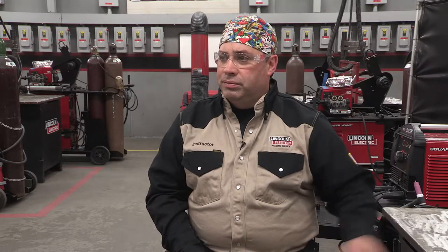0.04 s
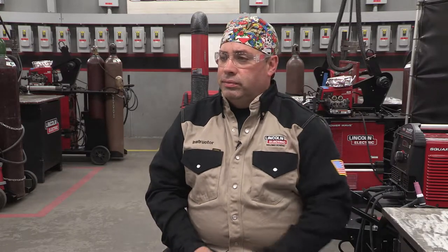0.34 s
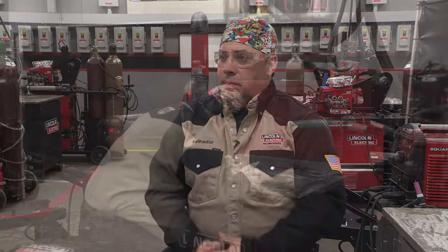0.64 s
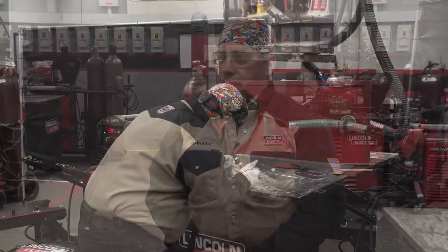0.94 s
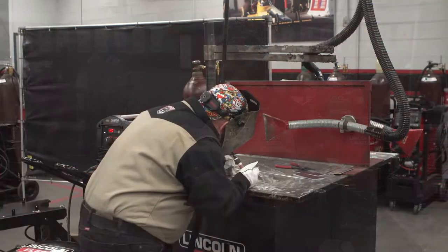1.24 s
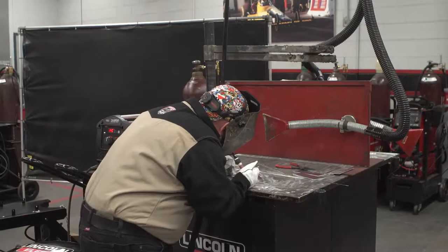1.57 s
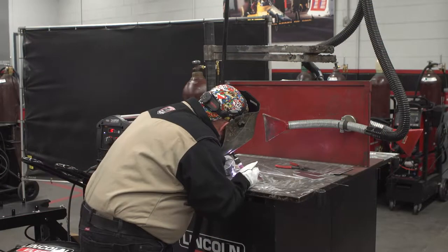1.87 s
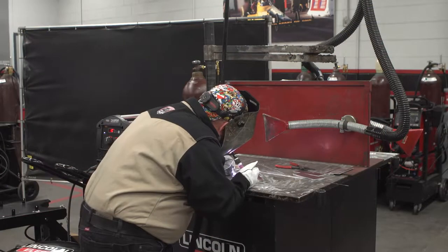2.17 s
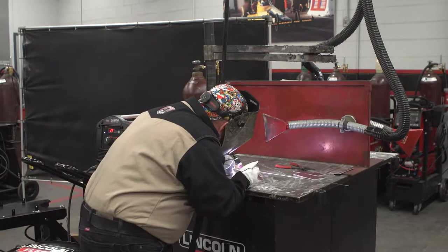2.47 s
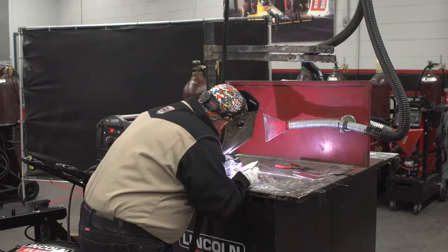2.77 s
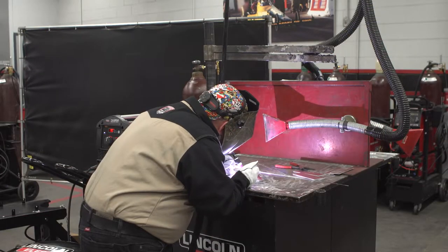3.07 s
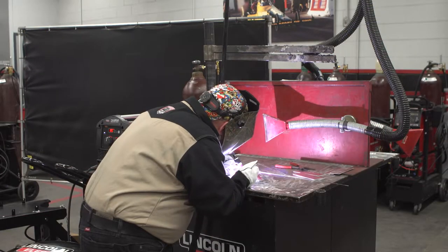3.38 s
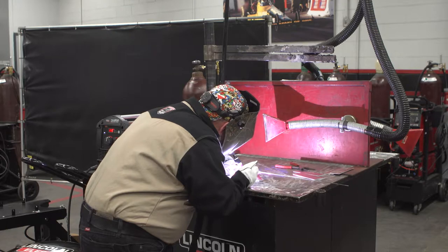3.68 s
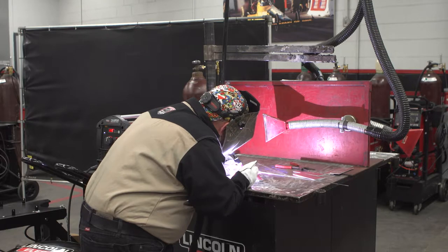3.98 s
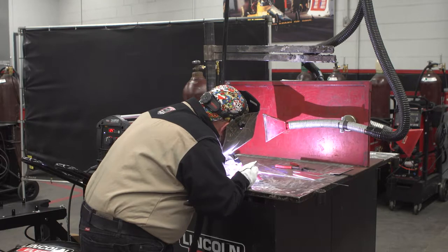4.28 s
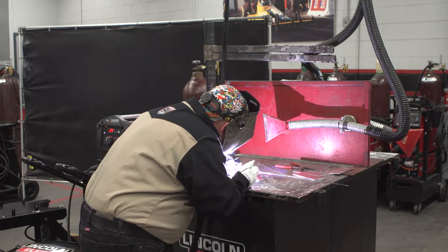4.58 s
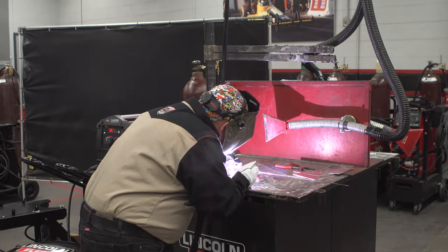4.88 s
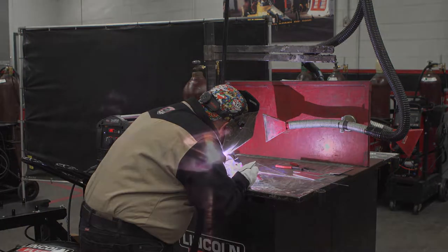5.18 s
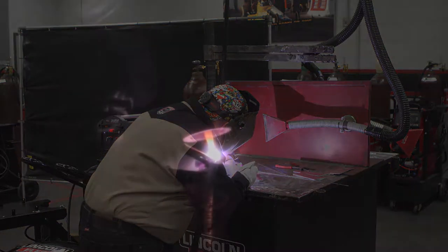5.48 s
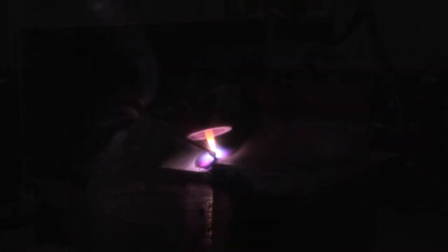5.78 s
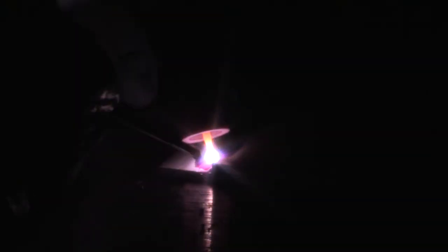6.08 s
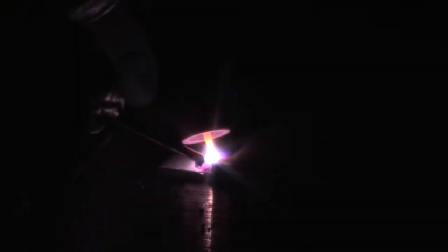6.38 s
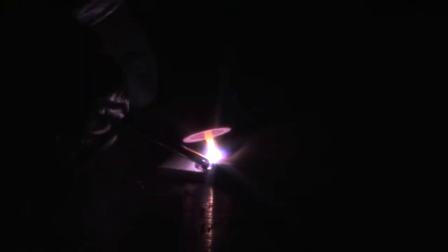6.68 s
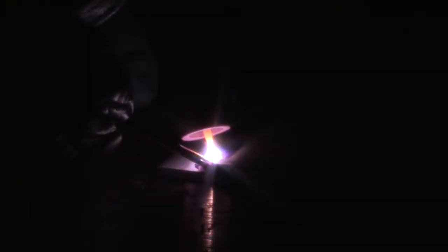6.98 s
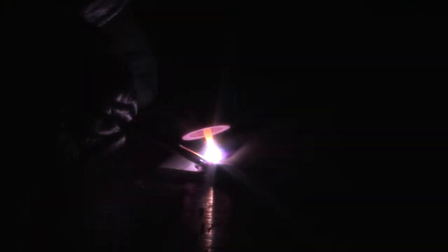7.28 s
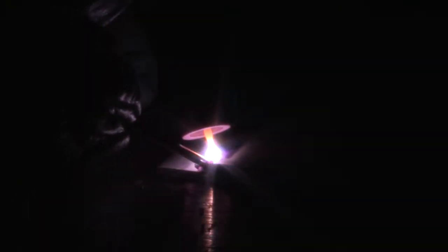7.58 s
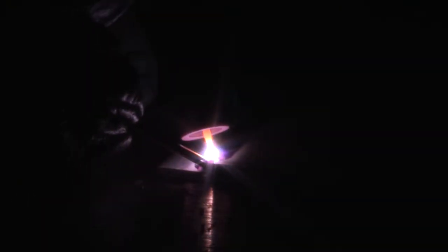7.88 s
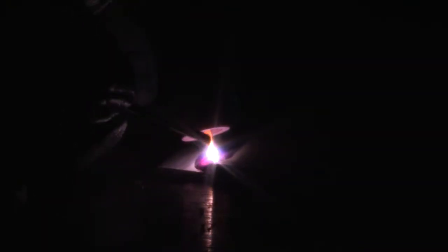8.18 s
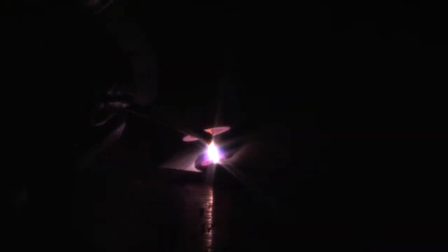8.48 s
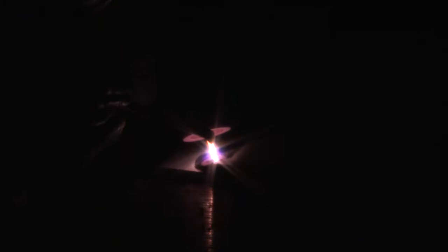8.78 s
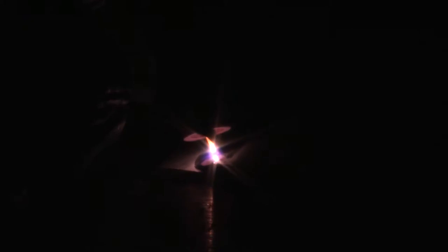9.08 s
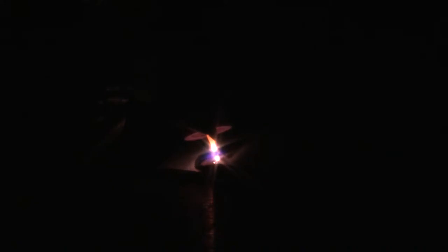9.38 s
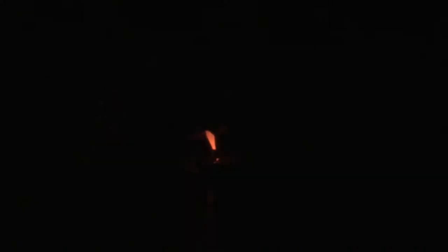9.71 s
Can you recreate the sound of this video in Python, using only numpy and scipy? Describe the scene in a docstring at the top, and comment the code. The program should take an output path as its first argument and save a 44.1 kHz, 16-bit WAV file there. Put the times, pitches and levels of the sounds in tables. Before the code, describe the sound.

A fume extractor's airy roar and low rumble rise at the start in a slightly reverberant workshop, with a faint hiss of gas. Light ticks come at about 0.3 and 1 second, then a few small sputters. At 1.7 seconds a welding arc strikes with a pop and begins a subdued electric buzz. Between 2.4 and 2.8 seconds it swells loud and raspy, with a low hum, a fast, even flutter and a growing sizzle. Small spits dot the buzz until about 5.2 seconds. Then the sound shifts to close beside the torch, where the buzz changes colour and the hiss drops back. Two brief spits come near 6.7 seconds. From about 8.1 seconds the buzz tapers down, turns slightly harsher near 9.4 and cuts off at 9.6, leaving only the extractor and faint gas hiss.

```python
"""AC TIG welding in a workshop. Over a fume extractor and the hiss of shielding gas come a few ticks,
then the arc pops alight. It buzzes: each current cycle snaps at both changes of polarity and pushes
the heated air, and the pulse train stumbles 17 times a second. The current rises and the pool spits.
Heard at first from behind the welder, then from close to the torch, the arc is tapered down,
the torch lifts and the arc goes out."""
import sys
import numpy as np
from scipy import signal
from scipy.fft import rfft, irfft, next_fast_len
from scipy.io import wavfile
from scipy.ndimage import uniform_filter1d, map_coordinates

SR = 44100
rng = np.random.default_rng(int(sys.argv[2]) if len(sys.argv) > 2 else 0)


def dump_mix(stems):
    """Bounce the given channels to the path in sys.argv[1] as a 16-bit WAV at rate SR."""
    frames = np.atleast_2d(stems).T  # one column per channel
    limited = np.clip(frames, -1, 1)  # hard clip at full scale
    pcm = np.round(limited * 32767).astype(np.int16)
    wavfile.write(sys.argv[1], SR, pcm)


N = 434385

CYCLE_S, REVERSAL_S = .008298, .00209  # period of the current; delay of its second snap
ARC_ON_S, CUT_S = 1.8064, 5.266  # the arc holds; the scene changes from the bench to beside the torch
# Foot pedal (low start, full current, taper to fill the crater): time_s, current_db
CURRENT = [(1.8, -10), (2.38, -13.5), (2.83, .5), (3.5, -1.5), (5.25, 0), (5.8, -1), (6.15, 1), (8.1, -1),
           (8.6, -5), (8.9, -10.5), (9.35, -17)]


def arc():
    """Periodic excitation: snaps and air pulses make a buzz, heard at the bench, then by the torch."""
    # Resonances of the snaps at each place: pitch_hz, width_hz, gain_db
    bench_modes = [(1320, 1200, -11), (1706, 73, 5), (2188, 110, -2.5), (3210, 170, -6.5),
                   (3634, 110, -4.5), (4194, 330, -4), (4700, 970, -12), (6580, 240, -5.5),
                   (7290, 220, -7.5), (8030, 760, -8.5), (9580, 1700, -16), (11540, 160, -11),
                   (12580, 480, -20.5), (15700, 170, -35)]
    close_modes = [(1740, 310, -6.5), (2232, 86, 4.5), (2733, 180, -3), (3234, 220, -2), (4110, 780, -2),
                   (5360, 560, -3.5), (6320, 510, -5.5), (7570, 700, -6), (8170, 520, -7.5),
                   (9200, 860, -5), (11650, 620, -10.5), (13350, 700, -10.5), (14500, 1200, -14.5),
                   (15800, 400, -14.5)]
    # Bark, crack, sizzle and fizz bands at each place: base_db, db_per_current_db
    bench_bands = [(-24, 0.27), (-22, 0.33), (-21.5, 0.16), (-30.5, 0.1)]
    close_bands = [(-30, 0.47), (-22.5, 0.37), (-23, 0.3), (-29, 0.35)]
    # Spectrum of the air pulse at each place: frequency_hz, gain_db
    bench_push = [(40, -17), (120, 3), (240, -5.5), (360, -12.5), (480, 1.5), (600, -0.5), (720, -8),
                  (850, -4), (1080, -13), (1250, -4.5), (1500, -27.5), (4000, -64.5)]
    close_push = [(40, -28.5), (120, 2), (240, -4), (360, -10.5), (480, -2.5), (600, 0.5), (720, -12),
                  (960, -7), (1080, -12), (1250, -11.5), (1600, -25.5), (4000, -51)]
    far = cycles(ARC_ON_S, 5.27, spacing_s=.05993, heard_s=0, stumble_s=.0003, slip_s=.00005)
    near = cycles(5.2354, 9.641, spacing_s=.05987, heard_s=CUT_S, stumble_s=.0004, slip_s=.00004)
    bench = snaps(far, bench_modes, bench_bands, second=.69, jitter_s=4e-6,
                  sputter=.16, sputter_t60=.025, glint=1.0)
    close = snaps(near, close_modes, close_bands, second=.41, jitter_s=3e-6,
                  sputter=.18, sputter_t60=.012, glint=.72)
    hum = push(far, bench_push, level_db=-24.5, unrest_db=4.5, gurgle=.34)
    hum += push(near, close_push, level_db=-26.7, unrest_db=1.5, gurgle=.16)
    return amp(-.42) * bench + amp(-.92) * close + hum


def cycles(start_s, end_s, spacing_s, heard_s, stumble_s, slip_s, count=7, misfire_s=2.822):
    """Quantised timing: groups of even cycles restart near a quarter-cycle beat of the welder's clock."""
    # Stumbles that last one beat longer: time_s
    stutters = [1.869, 2.77, 2.95, 4.086, 4.625, 4.865, 5.164, 8.53]
    beat = CYCLE_S / 4
    due = np.arange(0, end_s - start_s, spacing_s)
    stumble, slip = rng.uniform(-1.1, 1, (len(due), 2)).T
    late = np.abs(start_s + due[:, None] - stutters).min(axis=1) < CYCLE_S
    beats = np.round((due + stumble_s * stumble) / beat) + late
    restarts = start_s + beat * beats + slip_s * slip
    times = (restarts[:, None] + CYCLE_S * np.arange(count)).ravel()
    fires = np.abs(times - misfire_s) > CYCLE_S / 2
    return times[(times >= heard_s) & (times < end_s) & fires]


def snaps(times, modes, bands, second, jitter_s, sputter, sputter_t60, glint, spread_db=1.5):
    """Impulse excitation: the arc relights at each polarity change, sputters and rings the modes."""
    # Limits of the four bands: edge_hz
    edges = (1100, 2600, 5800, 11000, 20000)
    chance = rng.standard_normal((4, len(times)))
    lead = unit(clicks(times + jitter_s * chance[0], amp(spread_db * chance[1])))
    reversal = unit(clicks(times + REVERSAL_S + jitter_s * chance[2], amp(spread_db * chance[3])))
    train = unit(lead + second * reversal)
    trail = unit(ring(train, decay(sputter_t60)) * rng.standard_normal(N))
    trail = filtered(trail, lambda hz: 1 + (hz / 11000) ** 2)  # the buzz is roughest in the treble
    drive = train + sputter * trail + glint * glints(lead + .67 * reversal)
    sound = filtered(drive, lambda hz: resonances(modes, hz))
    parts = [filtered(sound, lambda hz: above(hz, lo) - above(hz, hi))
             for lo, hi in zip(edges, edges[1:])]
    return duty(times) * sum(amp(db) * unit(part) for db, part in zip(snap_levels(bands), parts))


def snap_levels(bands, lift_s=9.32, lift_rise_s=.27, flicker_db=.2):
    """Amplitude modulation: each band's level in dB follows current, metal heat and arc length."""
    # Change in each band while the metal is cold: gain_db
    cold_gains = [-10.5, -3.5, 1.1, 1.5]
    # Change in each band as the lifting torch lengthens the arc: gain_db
    lift_gains = [3.4, 2.3, 1.7, 3]
    current_db, cold = curve(CURRENT), settling()
    lift = np.clip((np.arange(N) / SR - lift_s) / lift_rise_s, 0, 1)
    return [db + slope * current_db + cold_db * cold + lift_db * lift + flicker_db * wobble(5)
            for (db, slope), cold_db, lift_db in zip(bands, cold_gains, lift_gains)]


def push(times, colour, level_db, unrest_db, gurgle):
    """Thermal expansion: the air swells once a cycle in a hum and gurgles over the restless pool."""
    swing_db = unrest_db * rng.standard_normal(len(times))
    hum = ring(clicks(times, amp(.42 * swing_db)), pulse(colour))
    puffs = ring(clicks(times, amp(swing_db)), decay(t60=.019)) * rng.standard_normal(N)
    pool = filtered(puffs, lambda hz: resonances([(253, 660, 0)], hz) * (1 - above(hz, 3600, order=4)))
    return duty(times) * amp(level_db + curve(CURRENT)) * (gurgle * unit(pool) - unit(hum))


def glints(train, t60=.011, drift_rad=.61, edge_hz=5800, lag_s=.0004):
    """Scattering: treble glances off nearby steel in a pattern that drifts as the torch moves."""
    turn = drift_rad * wobble(1.202)
    first, second = [unit(ring(train, np.pad(scatter(t60), (round(lag_s * SR), 0)))) for _ in range(2)]
    echoes = np.cos(turn) * first + np.sin(turn) * second
    return filtered(echoes, lambda hz: above(hz, edge_hz, order=4))


def scatter(t60, size=1024):
    """Diffuse reflection: a cloud of tiny echoes, even in colour, smears a click."""
    cloud = rfft(decay(t60)[:size] * rng.standard_normal(size))
    power = uniform_filter1d(np.abs(cloud) ** 2, size=14)
    return irfft(cloud / np.sqrt(power + 1e-12))


def pops(spit_spark_db=-20):
    """Sudden expansion of hot gas: the strike and each spit send out a pulse with a spark on top."""
    # The arc lights: start_s, level_db, relative_spark_db
    strike = (1.7265, .5, -7)
    # Spits of the molten pool, repeating each cycle while they last: start_s, level_db, length_s
    spits = [(2.673, -7.5, .004), (2.828, -15, .004), (3.044, -12, .004), (3.528, -14, .004),
             (3.887, -13, .004), (4.446, -12, .004), (4.587, -10, .004), (4.759, -9, .004),
             (4.847, -9, .004), (5.042, -9.5, .004), (5.22, -6.5, .004), (6.690, -12.5, .029),
             (6.793, -11.5, .012)]
    # Spectrum of a pop: frequency_hz, gain_db
    colour = [(25, -2), (100, 6.5), (350, -1), (800, -3.5), (1600, -5.5), (3000, -24), (8000, -40)]
    bursts = [(start + later, db, spit_spark_db)
              for start, db, length in spits for later in np.arange(0, length, CYCLE_S)]
    times, db, spark_db = np.transpose([strike] + bursts)
    blow = clicks(times, amp(db)) - .59 * clicks(times + REVERSAL_S, amp(db))
    spark = ring(clicks(times, amp(db + spark_db)), decay(t60=.02)) * rng.standard_normal(N)
    return .83 * spark - 1.1 * ring(blow, pulse(colour))


def ticks():
    """Damped bursts of band-limited noise: ticks, puffs and sputters before the arc holds."""
    # Bursts, each in a band lying mostly below its pitch: start_s, level_db, pitch_hz, t60_s
    bursts = [(.277, -30, 9050, 0.03), (1.002, -35, 10000, .04), (1.558, -25, 900, 0.058),
              (1.681, -32, 5500, 0.027), (1.730, -16, 151, 0.071), (1.73, -34, 11000, .09),
              (1.747, -28, 9000, 0.11), (1.752, -31, 10100, 0.084), (1.758, -28, 8000, 0.046)]
    out = np.zeros(N)
    for start, db, hz, t60 in bursts:
        envelope = decay(t60)
        band = signal.butter(1, [hz * .72, min(hz * 1.02, SR / 2 - 1000)], "band", fs=SR)
        noise = unit(signal.lfilter(*band, rng.standard_normal(len(envelope))))
        out[round(start * SR):][:len(envelope)] += amp(db) * envelope * noise
    return out


def gas(start_db=-46, swell_db=-32.5, close_db=-49, rise_s=.17):
    """Jet noise: argon hisses from the nozzle; at the bench, extra hiss swells to fill out the sizzle."""
    # Resonances of the nozzle: pitch_hz, width_hz, gain_db
    modes = [(4030, 550, 3), (7720, 510, 6.5), (8700, 690, -1.5)]
    level_db = by_place(swell_db + (start_db - swell_db) * settling(), close_db)
    flow = 1 - np.exp(-np.arange(N) / SR / rise_s)
    hiss = filtered(rng.standard_normal(N), lambda hz: resonances(modes, hz) * hz / (hz + 3000))
    return flow * amp(level_db) * unit(hiss)


def extractor(rumble_follows=.35, blade_hz=225.7, blade_db=-10, overtone_db=-24):
    """Turbulence: air roars in the fume duct under a wavering blade-passing tone, over a steady low rumble."""
    # Heard level of the background roar, which fades in, then ducks under the arc: time_s, level_db
    heard_levels = [(0, -34.5), (.42, -27), (1.6, -25.5), (2.4, -27), (2.7, -32), (8.3, -33.5), (9.6, -32)]
    # Spectra of the roar and the rumble: frequency_hz, density_db
    roar_colour = [(25, -36), (80, -11), (130, -13.5), (229, -0.5), (330, -3), (439, -5.5), (659, -13.5),
                   (887, -12.5), (1230, -22.5), (2050, -25.5), (4370, -35), (5200, -42), (8000, -39),
                   (16000, -50)]
    rumble_colour = [(15, -40), (30, -17), (50, -8), (72, -4), (110, -5), (200, -20), (600, -45)]
    roar_db = curve(heard_levels)
    rumble_db = by_place(bench=-37, close=-43) + rumble_follows * (roar_db - roar_db.mean())
    roar, rumble = [unit(filtered(rng.standard_normal(N), lambda hz: amp(along(colour, hz))))
                    for colour in (roar_colour, rumble_colour)]
    phase = 2 * np.pi * blade_hz * np.arange(N) / SR + .5 * wobble(6.1)
    blades = amp(blade_db + 2.5 * wobble(7)) * np.sin(phase) + amp(overtone_db) * np.sin(4 * phase)
    return amp(roar_db + .59 * wobble(6)) * (roar + blades) + amp(rumble_db) * rumble


def workshop(x):
    """Reverberation: each frequency dies away in the hall at its own rate."""
    # Reverberation times: frequency_hz, t60_s
    room = [(150, 0.69), (2000, 0.56), (6000, 0.27), (15000, 0.65)]
    hz, t, spectra = signal.stft(rng.standard_normal(SR), SR, nperseg=256)
    fade = np.exp(-np.log(1000) * t / along(room, hz)[:, None])
    _, tail = signal.istft(spectra * fade, SR, nperseg=256)
    return ring(x, np.pad(tail / np.linalg.norm(tail), (SR // 200, 0)))


def settling(time_constant_s=1.47):
    """Exponential relaxation: 1 until the arc holds, then falling towards 0."""
    return np.exp(-np.maximum(np.arange(N) / SR - ARC_ON_S, 0) / time_constant_s)


def by_place(bench, close):
    """One value behind the welder, another beside the torch."""
    return np.where(np.arange(N) / SR < CUT_S, bench, close)


def duty(times):
    """Overall rms of a signal that has rms 1 during these cycles only."""
    return np.sqrt(len(times) * CYCLE_S / (N / SR))


def amp(db):
    """Decibels to gain."""
    return 10 ** (np.asarray(db) / 20)


def unit(x):
    """x at rms 1."""
    return x / np.sqrt(np.mean(x ** 2) + 1e-20)


def along(points, hz):
    """Interpolation of (frequency_hz, value) points on a log axis."""
    frequencies, values = np.transpose(points)
    return np.interp(np.log(hz + 1), np.log(frequencies + 1), values)


def curve(points):
    """Interpolation of (time_s, value) points at every sample."""
    return np.interp(np.arange(N) / SR, *np.transpose(points))


def wobble(rate):
    """A smooth random curve, rate knots a second."""
    return map_coordinates(rng.standard_normal(int(N * rate / SR) + 4), [np.arange(N) * rate / SR])


def filtered(x, response):
    """Linear filtering: the spectrum of x times a frequency response."""
    size = next_fast_len(N + SR // 2, True)
    return irfft(rfft(x, size) * response(np.fft.rfftfreq(size, 1 / SR)), size)[:N]


def resonances(modes, hz):
    """Modal superposition: the response of damped resonators, alternating in sign."""
    return sum((-1) ** k * amp(db) * 1j * hz * width / (pitch ** 2 - hz ** 2 + 1j * hz * width)
               for k, (pitch, width, db) in enumerate(modes))


def above(hz, edge_hz, order=16):
    """Gain of a high-pass."""
    return 1 - 1 / (1 + (hz / edge_hz) ** order)


def pulse(colour, size=4096):
    """A minimum-phase pulse of peak 1 with the given spectrum."""
    cepstrum = irfft(np.log(amp(along(colour, np.fft.rfftfreq(size, 1 / SR)))))
    cepstrum[1:size // 2] *= 2
    cepstrum[size // 2 + 1:] = 0
    shape = irfft(np.exp(rfft(cepstrum)))
    return shape / np.abs(shape).max()


def clicks(times, sizes, order=8):
    """Band-limited impulses, placed between samples by sinc interpolation."""
    at = np.asarray(times)[:, None] * SR
    taps = np.floor(at).astype(int) + np.arange(1 - order, order + 1)
    shape = np.sinc(taps - at) * np.sinc((taps - at) / order)
    return np.bincount(taps.ravel(), (shape * np.asarray(sizes)[:, None]).ravel(), N)[:N]


def ring(x, shape):
    """Convolution: every impulse of x starts the given shape."""
    return signal.oaconvolve(x, shape)[:N]


def decay(t60):
    """Exponential damping by 60 dB in t60 seconds."""
    return np.exp(-np.log(1000) * np.arange(SR // 8) / SR / t60)


def scene():
    """Superposition: the weld and its reverberation, over the extractor and the gas."""
    weld = arc() + pops() + ticks()
    return (weld + amp(-10) * workshop(weld) + extractor() + gas())[None]


def record(dry, ceiling=.74, order=4, top_hz=15900):
    """Soft saturation rounds the tallest peaks; a low-pass then limits the band."""
    rounded = dry[0] / (1 + np.abs(dry[0] / ceiling) ** order) ** (1 / order)
    return filtered(rounded, lambda hz: hz < top_hz)[None]


dry = scene()
out = record(dry)
dump_mix(out)
```